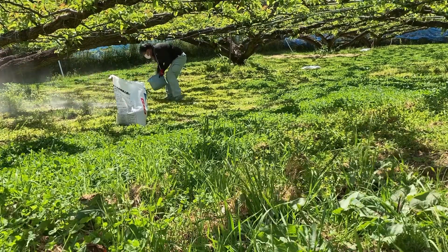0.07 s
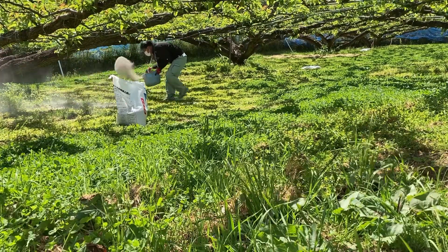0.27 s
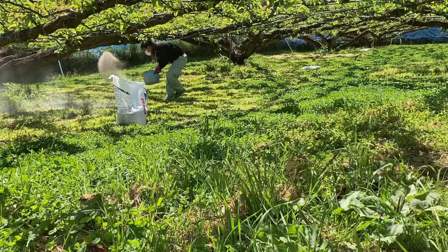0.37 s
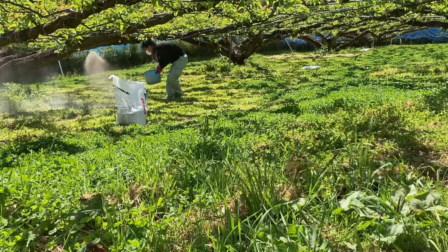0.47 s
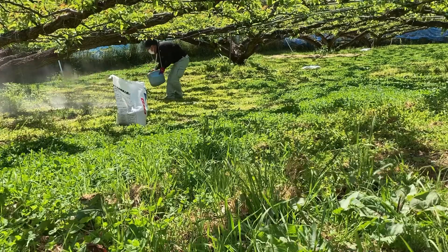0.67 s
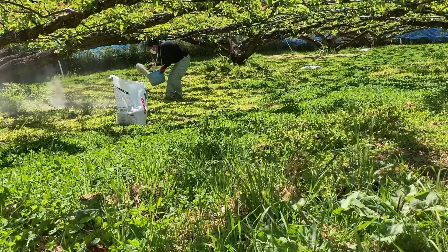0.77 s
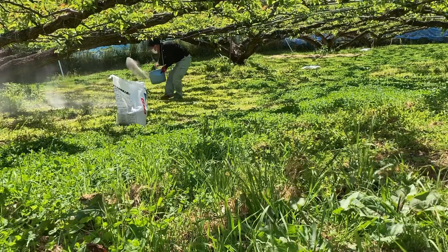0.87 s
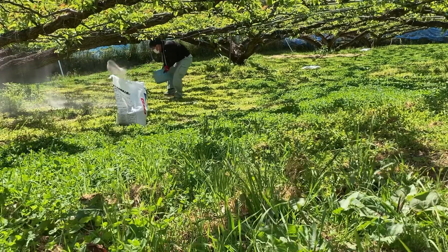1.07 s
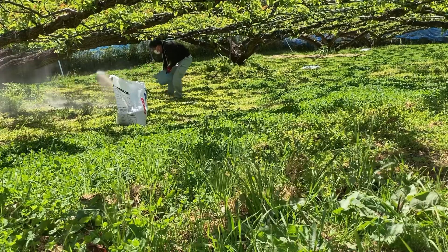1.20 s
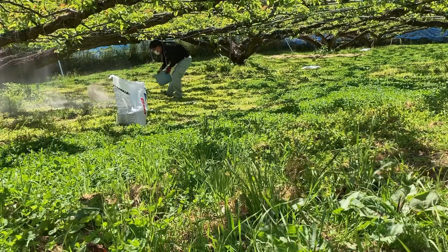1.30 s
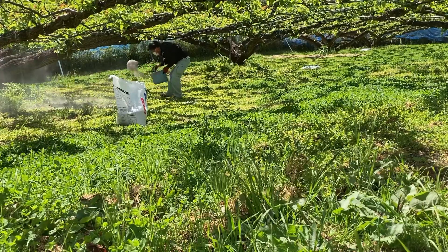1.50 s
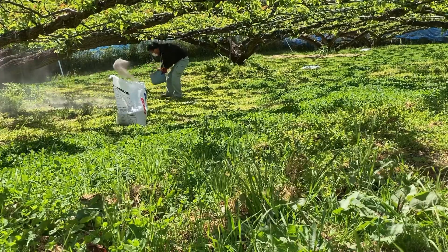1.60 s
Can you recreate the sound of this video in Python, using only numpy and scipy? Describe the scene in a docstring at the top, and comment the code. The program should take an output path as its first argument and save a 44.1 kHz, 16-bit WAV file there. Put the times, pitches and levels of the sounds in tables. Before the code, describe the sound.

Handfuls of powder scatter over orchard grass in brief, fine hisses, with faint rustles as they leave the hand and soft pats on landing. Low, uneven wind rumbles on the microphone, a few metres from the throwing.

```python
"""Powder flung across an orchard

Handfuls of powder are thrown from a bucket a few metres away. Each slides off the hand with a faint
rustle, then strikes grass and leaves as countless tiny impacts that merge into a hiss, with soft pats
where clumps land. Light wind rumbles and buffets the microphone's two ports."""
import sys
import numpy as np
from scipy import signal
from scipy.fft import rfft, irfft
from scipy.io import wavfile
from scipy.ndimage import uniform_filter1d

SR = 44100
rng = np.random.default_rng(int(sys.argv[2]) if len(sys.argv) > 2 else 0)


def master_out(mix):
    """Clip the mix to full scale and print it as 16-bit PCM to the path in sys.argv[1]."""
    frames = np.transpose(np.atleast_2d(mix))
    ceiling = np.clip(frames, -1, 1)
    pcm = np.round(ceiling * 32767).astype(np.int16)
    wavfile.write(sys.argv[1], SR, pcm)


N = 72765
T = np.arange(N) / SR
HZ = np.fft.rfftfreq(N, 1 / SR)

# Likeness of the landing grains at the two ports. Each row: frequency in Hz, coherence from 0 to 1.
GRAIN_COHERENCE = [(500, .5), (3000, .55), (5000, .35), (6600, .94), (13500, .94), (16000, .85)]


def amp(db):
    """Amplitude grows tenfold every 20 dB."""
    return 10 ** (np.asarray(db) / 20)


def unit(x):
    """Normalisation to an rms of 1."""
    return x / np.sqrt(np.mean(x ** 2) + 1e-20)


def over_hz(points):
    """Interpolation on a log-frequency axis."""
    hz, value = np.transpose(points)
    return np.interp(np.log(HZ + 1), np.log(hz + 1), value)


def over_time(points):
    """Linear interpolation in time."""
    return np.interp(T, *np.transpose(points))


def noise():
    """Two incoherent white noises."""
    return rng.standard_normal((2, N))


def wander(rate_hz):
    """Low-passed noise fluctuates smoothly, with an rms of 1."""
    return unit(irfft(rfft(rng.standard_normal(N)) / (1 + (HZ / rate_hz) ** 4), N))


def grains(per_s, spread_db):
    """Shot noise: two independent trains of impulses, random in time, sign and size."""
    size = amp(spread_db * np.minimum(rng.exponential(1, (2, N)), 4))
    return unit(np.sign(noise()) * size * (rng.random((2, N)) < per_s / SR))


def ports(pair, spectrum, coherence, lead_rad=0, balance_db=0):
    """Partial coherence: the two ports get the sum and difference of two signals, coloured alike."""
    a, b = rfft(pair)
    shared, apart = a * np.sqrt(1 + coherence), b * np.sqrt(1 - coherence)
    side = np.exp(.5j * lead_rad) * amp(balance_db / 2)
    left, right = (shared + apart) * side, (shared - apart) / side
    return unit(irfft(np.array([left, right]) * amp(over_hz(spectrum)), N))


def from_grass(pair, spectrum, coherence):
    """Direction cues: sound from the landing place reaches the ports unequal in phase and level."""
    # Each row: frequency in Hz, phase lead of the left port in radians.
    phase = [(0, 0), (1400, .7), (3000, 2.7), (5400, 3.1), (6900, 0), (9150, -3.14), (11450, -6.28),
             (13750, -9.42), (16000, -12.57)]
    # Each row: frequency in Hz, level of left over right in dB.
    balance = [(300, 18), (1300, 2), (4400, 4), (7500, -1), (16000, 0.5)]
    return ports(pair, spectrum, coherence, np.interp(HZ, *np.transpose(phase)), over_hz(balance))


def spray():
    """Superposition: dense fine impacts on the leaves merge into a hiss, dotted with sparser ticks."""
    # Powder reaching the grass. Each row: time in seconds, relative level in dB.
    landing = [(0.0, -59.5), (0.054, -65.5), (0.072, -57.5), (0.096, -65), (0.27, -79.5), (0.418, -82.5),
               (0.432, -72.5), (0.546, -53.5), (0.808, -51.5), (0.83, -49), (0.942, -62), (1.116, -57.5),
               (1.162, -60), (1.262, -55), (1.282, -51.5), (1.3, -49.5), (1.46, -70), (1.65, -70.5)]
    # Grains on leaves. Each row: frequency in Hz, relative spectral density in dB.
    hiss = [(300, -63), (800, -25.5), (1500, -17.5), (2400, -30.5), (3300, -7.5), (5200, -7.5),
            (6500, -3.5), (8000, -1), (10000, 1), (12000, -1), (14000, -9), (16000, -9)]
    gain_db, flutter_db = 4.5, 0.89
    fine = grains(per_s=30000, spread_db=1.5)
    ticks = amp(-13) * grains(per_s=290, spread_db=-0.5)
    level_db = over_time(landing) + gain_db + flutter_db * wander(rate_hz=60)
    return amp(level_db) * from_grass(fine + ticks, hiss, over_hz(GRAIN_COHERENCE))


def swells(events):
    """A hyperbolic-secant envelope gives each event a rounded peak with exponential flanks."""
    return sum(amp(db) / np.cosh((T - peak_s) / np.where(T < peak_s, rise, fall))
               for peak_s, db, rise, fall in events)


def clumps():
    """A handful's dense core lands as a burst of impacts; a spectral peak gives the dull pat its pitch."""
    # Each row: peak time in seconds, level in dB, rise and fall in seconds, pitch in Hz.
    landings = [(0.074, -62, 0.0093, .012, 1430), (.545, -67, 0.0071, .018, 1830),
                (0.663, -54, .022, 0.007, 1305), (1.291, -52, 0.016, 0.021, 1647)]
    # Each row: frequency in Hz, relative spectral density in dB.
    pat = [(300, -49), (750, -16.5), (1200, -9), (1600, -4.5), (2100, -4.5), (2600, -1.5), (4000, -6),
           (6000, -24), (10000, -43), (16000, -37)]
    peak_db, half_width_hz = 8.5, 200
    out = np.zeros((2, N))
    for *swell, hz in landings:
        peak = amp(peak_db / (1 + ((HZ - hz) / half_width_hz) ** 2))
        impacts = irfft(rfft(grains(per_s=4000, spread_db=5.5)) * peak, N)
        out += swells([swell]) * from_grass(impacts, pat, coherence=0.61)
    return out


def tosses():
    """Sliding friction: powder rustles in many tiny contacts as it leaves the hand."""
    # Each row: peak time in seconds, level in dB, rise and fall in seconds.
    throws = [(.21, -66, 0.064, 0.038), (1.485, -62.5, 0.043, 0.046)]
    # Each row: frequency in Hz, relative spectral density in dB.
    rustle = [(400, -26), (800, 4), (1250, 14), (2200, 10), (2900, -4), (5000, -5.5), (16000, -84)]
    left_lead_s = 0.00037
    contacts = grains(per_s=9000, spread_db=-0.5)
    return swells(throws) * ports(contacts, rustle, coherence=0.79, lead_rad=2 * np.pi * HZ * left_lead_s)


def coarse_grains():
    """Impact noise: heavier grains on the soil patter lower than the fine hiss."""
    # Each row: peak time in seconds, level in dB, rise and fall in seconds.
    spells = [(.345, -73.5, 0.0087, 0.036), (.825, -64.5, 0.027, 0.029), (1.15, -63, 0.16, 0.12)]
    # Each row: frequency in Hz, relative spectral density in dB.
    patter = [(400, -20), (1100, -7.5), (2000, -2), (3500, 7), (5000, -4), (8000, -2), (16000, -38)]
    impacts = grains(per_s=7000, spread_db=4.0)
    return swells(spells) * from_grass(impacts, patter, over_hz(GRAIN_COHERENCE))


def turbulence(spectrum, steadiness):
    """Eddies make random pressure noise; steadiness, from 0 to 1, evens out its chance swells."""
    # Each row: frequency in Hz, coherence between the ports from 0 to 1.
    coherence = [(35, 1), (90, 0.49), (300, 0.82)]
    pressure = ports(noise(), spectrum, over_hz(coherence))
    power = uniform_filter1d((pressure ** 2).mean(0), size=1400)
    return unit(pressure / (abs(power) + 1e-6) ** (steadiness / 2))


def wind():
    """Turbulent flow over the ports rumbles, and sharper gusts ruffle at higher frequencies."""
    # Each row: time in seconds, relative level in dB.
    breeze = [(0.0, -50.5), (0.058, -69.5), (0.174, -48), (0.26, -25.5), (0.28, -28.5), (0.348, -50),
              (0.386, -34.5), (0.408, -46), (0.458, -31), (0.482, -45), (0.532, -33.5), (0.578, -57.5),
              (0.606, -42), (0.67, -45.5), (0.694, -54), (0.914, -52), (0.928, -43.5), (1.052, -45),
              (1.074, -58.5), (1.098, -38), (1.158, -40), (1.226, -58), (1.272, -41.5), (1.318, -42),
              (1.354, -42), (1.392, -46), (1.498, -51), (1.538, -68), (1.608, -46), (1.65, -55)]
    # Each row: peak time in seconds, relative level in dB, rise and fall in seconds.
    gusts = [(.015, -65, 0.012, 0.023), (.228, -51.5, 0.023, 0.015), (.287, -49.5, 0.0099, 0.013),
             (.39, -47, 0.0081, 0.011), (.436, -50.5, 0.012, 0.012), (.548, -51, 0.02, 0.021),
             (.984, -48.5, 0.0087, 0.0058), (1.107, -53.5, 0.0066, .012), (1.157, -49.5, 0.016, 0.029),
             (1.29, -64, 0.012, 0.043), (1.4, -71, 0.0047, 0.034), (1.497, -61, .012, 0.013),
             (1.6, -67.5, 0.0059, 0.011)]
    # Each row of both: frequency in Hz, relative spectral density in dB.
    rumble_spectrum = [(10, -50), (28, -13.5), (48, 0), (85, -2), (120, -15), (200, -30), (400, -57.5),
                       (900, -97)]
    ruffle_spectrum = [(50, -20), (130, 2), (200, -3), (300, -11), (400, -22.5), (520, -35.5), (1200, -85)]
    rumble = amp(over_time(breeze) - 2) * turbulence(rumble_spectrum, steadiness=0.46)
    ruffle = amp(3) * swells(gusts) * turbulence(ruffle_spectrum, steadiness=1.0)
    return rumble + ruffle


def buffets():
    """A single eddy striking the ports swings the pressure briefly: a sine under a Gaussian envelope."""
    # Each row: centre in seconds, envelope peak in dB, frequency in Hz, width in cycles.
    eddies = [(0.507, -31.5, 167, 0.36), (0.978, -43, 268, 1.45), (1.15, -33.5, 81, 0.3),
              (1.352, -29.5, 59.8, 0.48)]
    out = np.zeros(N)
    for centre_s, db, hz, width in eddies:
        cycles = hz * (centre_s - T)
        out += amp(db) * np.sin(2 * np.pi * cycles) * np.exp(-.5 * (cycles / width) ** 2)
    return out


def orchard_air():
    """Diffuse ambient noise is faint, steady and nearly incoherent between the ports."""
    # Each row: frequency in Hz, relative spectral density in dB.
    ambience = [(20, 5.5), (60, 25.5), (150, 3.5), (350, 6.5), (700, 3), (1400, 0.5), (2500, 7.5),
                (5000, -1), (10000, -29.5), (16000, -6)]
    return amp(-68) * ports(noise(), ambience, coherence=0.083)


def scene():
    """The pressures of powder, wind and ambient air add linearly."""
    powder = spray() + clumps() + tosses() + coarse_grains()
    return powder + wind() + buffets() + orchard_air()


def record(dry):
    """Band limiting: a linear-phase low-pass filter removes the highest treble."""
    cutoff_hz = 15850
    lowpass = signal.firwin(511, cutoff_hz, window=("kaiser", 9), fs=SR)
    return signal.oaconvolve(dry, lowpass[None], "same")


dry = scene()
out = record(dry)
master_out(out)
```